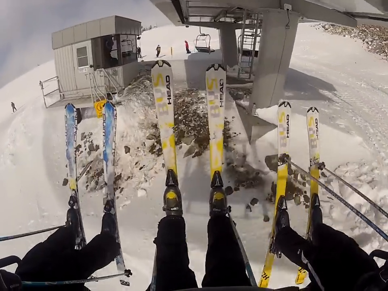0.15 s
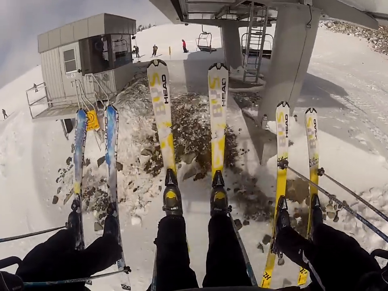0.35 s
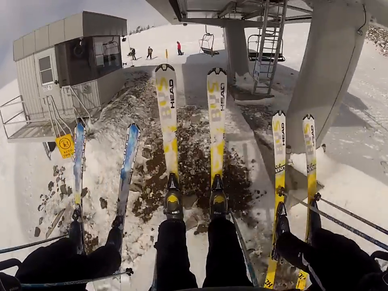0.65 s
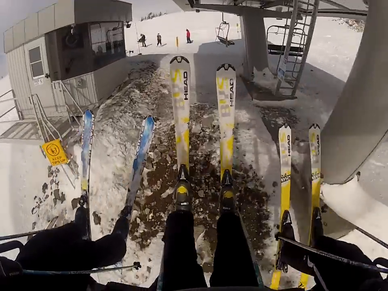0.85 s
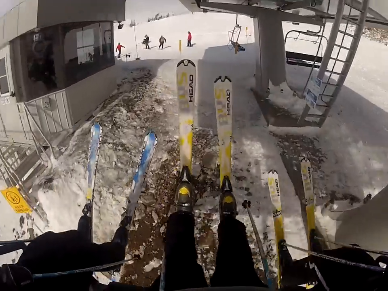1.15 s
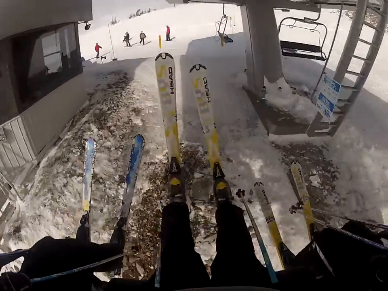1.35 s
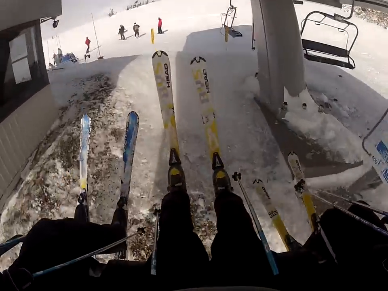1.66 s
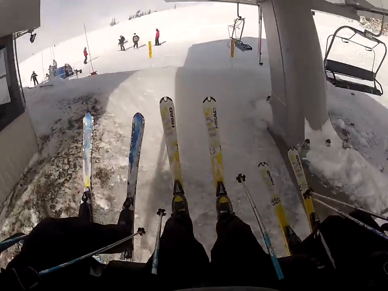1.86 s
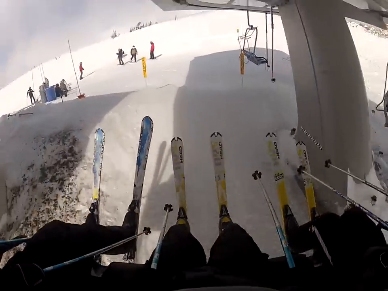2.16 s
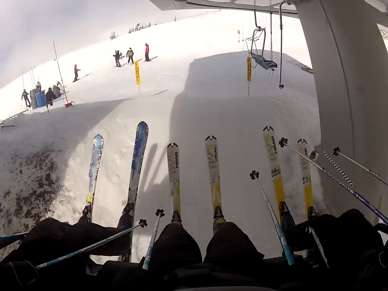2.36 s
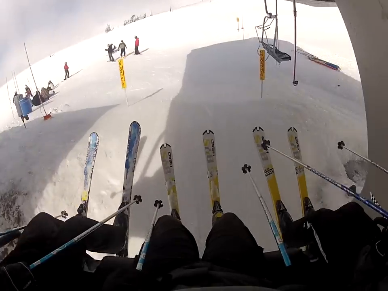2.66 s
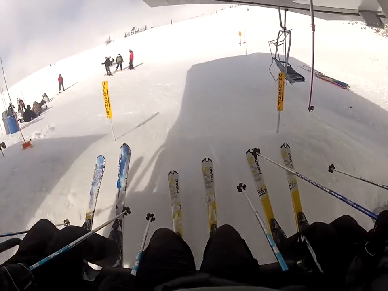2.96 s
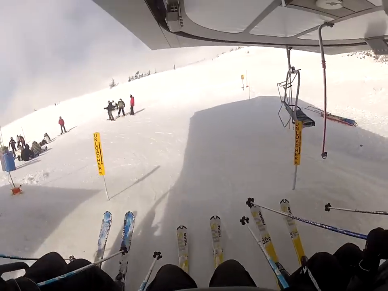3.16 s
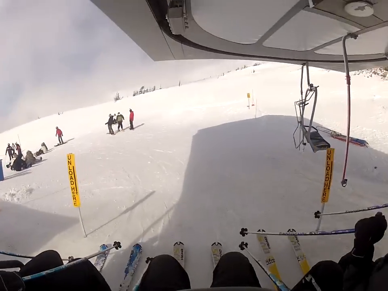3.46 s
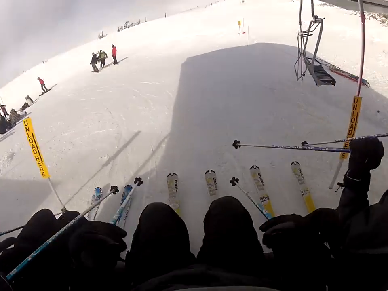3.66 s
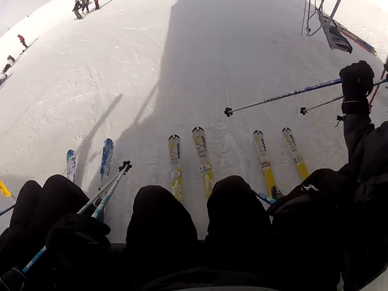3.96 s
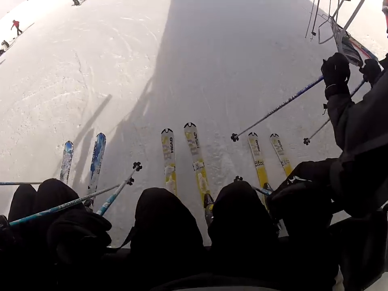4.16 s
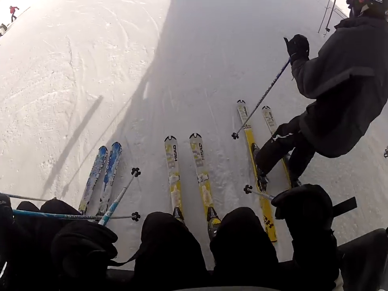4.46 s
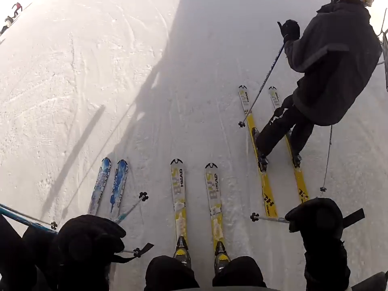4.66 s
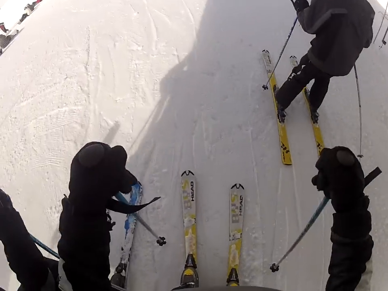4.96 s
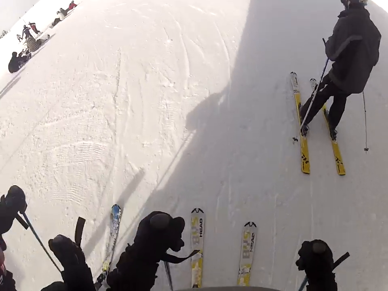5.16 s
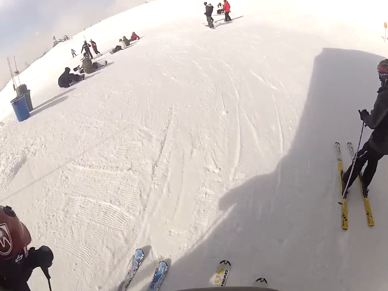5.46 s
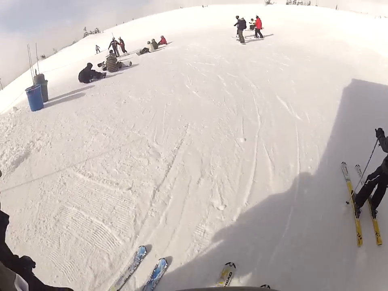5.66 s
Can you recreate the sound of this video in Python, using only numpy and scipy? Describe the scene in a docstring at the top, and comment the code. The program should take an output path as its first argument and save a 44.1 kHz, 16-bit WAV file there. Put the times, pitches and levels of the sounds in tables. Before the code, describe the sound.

Under a ski lift terminal, a low drive hum swells and dips over rumble and faint sheave whirr. Dull jolts and short scrapes cluster around one second. A metal safety bar clacks twice midway, then skis slap the snow with short thumps and glide with a soft bright hiss. Heard close and muffled from a small camera in a sealed case, with coarse, grainy treble.

```python
"""A drive hums and rumbles and sheaves whirr as a chair glides under the terminal of a ski lift.
Dull jolts and short scrapes come next, later clacks of the safety bar, slaps of skis and hiss on snow.
The hum is three wavering partials, the rest shaped noise, dying modes and short low swings.
A small camera in a sealed case hears it: it samples at 8 kHz and holds each sample,
so mirror images of everything fill the treble."""
import sys
import numpy as np
from scipy import signal
from scipy.fft import rfft, irfft
from scipy.io import wavfile
from scipy.ndimage import uniform_filter1d

SR = 44100
rng = np.random.default_rng(int(sys.argv[2]) if len(sys.argv) > 2 else 0)


def elevation(decibels):
    """Turn decibel levels (scalar or array-like) into linear amplitude ratios."""
    levels = np.asarray(decibels, float)
    return 10 ** (levels / 20)


def materialize(psi):
    """Save the field psi as 16-bit PCM at rate SR to the path in sys.argv[1].

    A 1-D psi becomes a single channel; in a 2-D psi each row is a channel.
    """
    bounded = np.clip(np.atleast_2d(psi).T, -1, 1)
    quanta = np.round(bounded * 32767).astype(np.int16)
    wavfile.write(sys.argv[1], SR, quanta)


N = 255780


def evened(x):
    """Scales to rms 1."""
    return x / np.sqrt(np.mean(x ** 2) + 1e-20)


def curve(rows, column=1):
    """One dB column of a table as a gain at every sample, -120 dB outside the table."""
    rows = np.array(rows)
    return elevation(np.interp(np.arange(N) / SR, rows[:, 0], rows[:, column], -120, -120))


def wander(top_hz):
    """Slow chance of rms 1: noise low-passed at top_hz."""
    rate_hz, settle = 1000, 400
    noise = rng.standard_normal(N // 44 + 500)
    slow = signal.lfilter(*signal.butter(2, top_hz, fs=rate_hz), noise)[settle:]
    return np.interp(np.arange(N) / SR, np.arange(len(slow)) / rate_hz, evened(slow))


def coloured(x, gain):
    """Filters by a magnitude given on the FFT bins, then scales to rms 1."""
    return evened(irfft(rfft(x) * gain, N))


def lumpy_noise(lumps_db, lumps_hz):
    """White noise whose level wanders by lumps_db rms."""
    return rng.standard_normal(N) * elevation(lumps_db * wander(lumps_hz))


def shaped(points, lumps_db, lumps_hz):
    """Lumpy noise with a spectrum drawn through points on a log frequency axis."""
    hz = np.fft.rfftfreq(N, 1 / SR)
    f, db = np.transpose(points)
    spectrum_db = np.interp(np.log(hz + 1), np.log(f + 1), db)
    return coloured(lumpy_noise(lumps_db, lumps_hz), elevation(spectrum_db))


def peaks_gain(peaks, hz):
    """Magnitude of resonances side by side, their powers added."""
    return np.sqrt(sum(elevation(2 * db) / (1 + (2 * (hz - f) / w) ** 2) ** 2.01 for f, w, db in peaks))


# Case resonances. Each row: centre in Hz, width in Hz, relative level in dB.
CASE_PEAKS = [(430, 356, 0), (702, 200, -3), (913, 257, 3), (1400, 1400, -3), (2090, 390, 0),
              (2940, 100, -12.5), (3620, 770, -13.5)]
# Case notches. Each row: centre in Hz, width in Hz, depth from 0 to 1.
CASE_NOTCHES = [(1070, 98, 0.52), (1730, 143, 0.59)]


def case_gain(hz, tilt_db):
    """Case resonances and notches, tilted by tilt_db per octave above 400 Hz."""
    dips = np.prod([1 - np.clip(depth, 0, 1) * np.exp(-((hz - f) / w) ** 2)
                    for f, w, depth in CASE_NOTCHES], axis=0)
    tilt = elevation(tilt_db * np.log2(np.maximum(hz, 400) / 1000))
    return dips * peaks_gain(CASE_PEAKS, hz) * tilt


def burst(noise, tilt_db):
    """A piece of noise heard through the case, rms 1."""
    return evened(irfft(rfft(noise) * case_gain(np.fft.rfftfreq(len(noise), 1 / SR), tilt_db)))


def crack(noise, tilt_db, t):
    """A burst that rises in about 1 ms and dies by 60 dB in 14 ms."""
    return burst(noise, tilt_db) * (1 - np.exp(-t / 0.00099)) * elevation(-60 * t / 0.014)


def ringing(modes, t):
    """Modes set off by a blow, each dying by 60 dB in its t60."""
    rise = 1 - np.exp(-t / 0.00045)
    return rise * sum(elevation(db - 60 * t / t60) * np.sin(2 * np.pi * hz * t) for hz, db, t60 in modes)


def add(mix, start_s, sound):
    """Mixes a sound in at start_s, in place."""
    part = mix[round(start_s * SR):][:len(sound)]
    part += sound[:len(part)]


# Hum as the chair moves under the roof. Each row: time in seconds, level in dB before the nodes.
HUM_LEVEL = [(0.0, -34), (0.39, -25.5), (0.77, -22.5), (1.05, -21.5), (1.3, -20.5), (1.6, -24), (2.1, -29),
             (2.5, -19.5), (2.74, -22.5), (3.0, -17), (3.41, -18), (3.56, -14), (3.8, -22), (3.95, -24.5),
             (4.36, -24), (4.7, -32), (5.05, -34), (5.15, -25), (5.35, -21.5), (5.45, -25.5), (5.8, -20.5)]
# Its overtones. Each row: time in seconds, second partial in dB, third partial in dB, before flutter.
OVERTONE_LEVELS = [(0.0, -49, -58.5), (0.4, -44, -47.5), (0.85, -44.5, -45.5), (1.11, -36.5, -47.5),
                   (1.6, -47.5, -36.5), (1.95, -41, -46.5), (2.6, -46, -45.5), (3.55, -35.5, -41),
                   (3.75, -33.5, -56), (4.0, -49.5, -45.5), (4.45, -38, -61), (4.95, -40, -47.5),
                   (5.35, -38, -60), (5.48, -43, -48.5), (5.8, -36.5, -59)]
# Quiet spots of the standing wave that the chair crosses.
# Each row: time in seconds, half width in seconds, depth in dB.
HUM_NODES = [(0.45, 0.054, -32), (0.66, 0.071, -20), (0.87, 0.14, -24), (1.44, 0.13, -30),
             (1.71, 0.13, -35), (2.28, 0.12, -25), (2.83, 0.12, -28), (4.16, 0.3, -50), (4.46, 0.044, -17),
             (4.59, 0.11, -9)]
HUM_HZ, UNDER_DRIVE_S = 101.66, 1.55


def hum():
    """Three partials of the drive, wavering in phase, the overtones also in level.
    At each node the lowest sinks and turns half a cycle: ahead on approach, back after."""
    t = np.arange(N) / SR
    nodes = []
    for s, half_width_s, depth_db in HUM_NODES:
        x = (t - s) / half_width_s
        nodes.append((x + 1j * np.sign(s - UNDER_DRIVE_S) * elevation(depth_db)) / np.sqrt(1 + x ** 2))
    levels = [curve(HUM_LEVEL) * np.prod(nodes, axis=0),
              curve(OVERTONE_LEVELS), curve(OVERTONE_LEVELS, column=2)]
    out = np.zeros(N)
    for k, level in enumerate(levels):
        waver_rad = (0.3 + 0.3 * k) * wander(2.5 + 0.7 * k)
        flutter_db = min(k, 1) * 2.96 * wander(8.0)  # none on the lowest
        phase_rad = 2 * np.pi * (k + 1) * HUM_HZ * t + waver_rad
        out += np.sqrt(2) * (level * elevation(flutter_db) * np.exp(1j * phase_rad)).imag
    return out


# Rumble through the chair frame. Each row: time in seconds, body in dB, deepest shudder in dB.
RUMBLE_LEVELS = [(0.0, -41.5, -38), (0.2, -33.5, -39), (0.43, -32.5, -33.5), (0.53, -32, -34.5),
                 (0.92, -38, -31), (1.1, -27, -29), (1.45, -32, -28), (1.8, -31, -33), (2.0, -31.5, -32),
                 (2.6, -31, -29.5), (2.9, -34.5, -36.5), (3.15, -34.5, -29), (3.7, -33.5, -32),
                 (4.1, -37.5, -33), (4.8, -38, -32), (5.2, -40, -37.5), (5.8, -37.5, -44)]
# Spectrum of the body. Each row: frequency in Hz, relative density in dB per Hz.
BODY_SPECTRUM = [(44, -64), (75, -21), (113, 2.5), (263, -12), (312, -13), (399, -23.5), (600, -37),
                 (780, -78), (1320, -120)]
# Spectrum of the shudder. Each row: frequency in Hz, relative density in dB per Hz.
SHUDDER_SPECTRUM = [(8, -37), (18, -2), (30, -1), (55, 0.4), (85, 2), (130, -43)]


def rumble():
    """Low lumpy noise in two bands, as rollers and grip jolt the frame."""
    body = curve(RUMBLE_LEVELS) * shaped(BODY_SPECTRUM, lumps_db=1.0, lumps_hz=28.0)
    shudder = curve(RUMBLE_LEVELS, column=2) * shaped(SHUDDER_SPECTRUM, lumps_db=1.75, lumps_hz=6.3)
    return body + shudder


# Whirr of sheaves and haul rope. Each row: time in seconds, level in dB.
WHIRR_LEVEL = [(0.0, -57.5), (0.3, -55), (0.75, -55.5), (0.8, -51), (0.9, -48), (1.44, -46.5),
               (2.15, -42.5), (2.57, -48), (3.09, -45), (3.33, -48.5), (4.39, -51.5), (5.8, -49.5)]
WHIRR_TILT_DB_PER_OCTAVE = 0.47


def whirr():
    """Rolling noise of the machinery, coloured by the case."""
    gain = case_gain(np.fft.rfftfreq(N, 1 / SR), WHIRR_TILT_DB_PER_OCTAVE)
    return curve(WHIRR_LEVEL) * coloured(lumpy_noise(0.67, 32.0), gain)


# Dull jolts of the chair frame; the last two are low bounces after the ski slap at 5.012 s.
# Each row: start in seconds, peak in dB, pitch in Hz.
JOLTS_AND_BOUNCES = [(0.159, -20.5, 186), (.176, -20.5, 198), (0.294, -20.5, 188), (0.31, -21, 170),
                     (0.498, -21, 126), (0.516, -22, 120), (0.571, -13.5, 133), (0.967, -13, 110),
                     (1.024, -12.5, 141), (1.099, -16, 148), (1.164, -10, 118), (1.237, -21, 136),
                     (5.039, -13.5, 90.5), (5.051, -17.5, 75)]


def jolts_and_bounces():
    """Each jolt or bounce: a cosine under a bell-shaped envelope about a cycle wide."""
    out, t = np.zeros(N), np.arange(4096) / SR
    for s, db, hz in JOLTS_AND_BOUNCES:
        cycles = hz * t - 1.2
        add(out, s, elevation(db) * np.exp(-(cycles / 0.45) ** 2) * np.cos(2 * np.pi * cycles))
    return out


# Short scrapes of skis, poles and cloth.
# Each row: start in seconds, level in dB before the envelope, decay in seconds, tilt in dB per octave.
SHORT_SCRAPES = [(0.274, -50, 0.04, 10), (0.756, -39.5, 0.22, -20), (0.757, -39.5, 0.049, 3),
                 (0.789, -41, 0.037, 12), (0.829, -36, 0.018, 5), (0.872, -46, 0.01, -16),
                 (0.973, -43, 0.022, -10), (1.004, -39.5, 0.0087, 2), (1.026, -37.5, 0.051, -2.5),
                 (1.084, -39.5, 0.04, 2.5), (2.967, -41.5, 0.017, -1), (4.628, -44.5, 0.0092, 7),
                 (4.676, -44, 0.017, 2.5), (4.71, -44, 0.041, 8), (4.814, -43.5, 0.012, 4),
                 (4.757, -46, 0.022, -0.5), (4.879, -45, 0.03, 1.5)]
BITE_S, FIRM_DB = 0.0014, -38  # rise time of a scrape at this level; lighter ones rise more slowly


def scrapes():
    """Each scrape bites, grinds unevenly and trails off: noise through the case."""
    out, t = np.zeros(N), np.arange(8192) / SR
    noises = rng.standard_normal((len(SHORT_SCRAPES), 8192))
    for (s, db, length_s, tilt_db), noise in zip(SHORT_SCRAPES, noises):
        grit = elevation(1.34 * evened(uniform_filter1d(noise[::-1], size=130)))
        bite = 1 - np.exp(-t / (BITE_S * elevation(FIRM_DB - db)))
        stroke = grit * bite * np.exp(-(t / length_s) ** 1.6)
        add(out, s, elevation(db) * stroke * burst(noise, tilt_db))
    return out


# Clacks of the metal safety bar. Each row: start in seconds, level in dB.
BAR_CLACKS = [(3.5646, -23), (3.5835, -14.5)]
# Modes of the bar. Each row: frequency in Hz, relative level in dB, t60 in seconds.
BAR_MODES = [(930, -4, 0.02), (1920, 2, 0.012), (1405, -4.5, 0.013), (1150, -3.5, 0.012),
             (2360, -42, 0.0046)]
BAR_CRACK_DB, BAR_TILT_DB_PER_OCTAVE = 5.5, -1  # crack beside the ring
BOUNCE_S, BOUNCE_DB = 0.0044, -5  # delay and level of the second landing


def clacks():
    """The bar cracks, rings for a few ms and bounces once."""
    out, t = np.zeros(N), np.arange(4096) / SR
    ring = ringing(BAR_MODES, t)
    for (s, db), noise in zip(BAR_CLACKS, rng.standard_normal((len(BAR_CLACKS), 4096))):
        landing = elevation(BAR_CRACK_DB) * crack(noise, BAR_TILT_DB_PER_OCTAVE, t) - ring
        add(out, s, elevation(db) * landing)
        add(out, s + BOUNCE_S, -elevation(db + BOUNCE_DB) * ring)
    return out


def thump(thump_hz, t):
    """A low swing that swells and dies while its pitch sags from an octave up to thump_hz."""
    cycles = thump_hz * t
    turns = cycles + 0.5 * (1 - np.exp(-cycles / 0.5))
    return cycles / 0.26 * np.exp(1 - cycles / 0.42) * np.sin(2 * np.pi * turns)


# Skis slap down. Each row: start in seconds, crack in dB before its envelope (the ring follows it),
# crack tilt in dB per octave, thump scale in dB, thump pitch it sags to in Hz.
SKI_SLAPS = [(3.726, -24, 5, -11, 53.8), (3.91, -34, 5, -37, 77.5), (3.953, -40, -6, -39, 79),
             (5.012, -14, 7, -10, 72), (5.344, -18, 6.5, -13, 70)]
# Modes of a ski. Each row: frequency in Hz, relative level in dB, t60 in seconds.
SKI_MODES = [(1277, 1.5, 0.018), (1810, -2, 0.022), (660, -6, 0.017), (967, -3, 0.02), (2350, -3, 0.017),
             (3650, -1.5, 0.0058)]
SKI_RING_DB = -3  # beside the crack


def knocks():
    """Each slap on the snow ramp: a crack, the ring of the ski and a thump."""
    out, t = np.zeros(N), np.arange(4096) / SR
    ring = elevation(SKI_RING_DB) * ringing(SKI_MODES, t)
    noises = rng.standard_normal((len(SKI_SLAPS), 4096))
    for (s, crack_db, tilt_db, thump_db, thump_hz), noise in zip(SKI_SLAPS, noises):
        slap = elevation(crack_db) * (crack(noise, tilt_db, t) + ring)
        add(out, s, slap + elevation(thump_db) * thump(thump_hz, t))
    return out


# Strokes of skis gliding on the snow. Each row: start in seconds, end in seconds, level in dB.
GLIDE_STROKES = [(5.03, 5.251, -49), (5.28, 5.352, -47.5), (5.358, 5.471, -47), (5.474, 5.794, -52.5)]
# Bands of the gliding hiss. Each row: centre in Hz, width in Hz, relative level in dB.
SNOW_BANDS = [(3560, 550, 1.5), (2100, 710, 1.5), (1280, 300, -3)]
GLIDE_RISE_S, GLIDE_FALL_S = 0.012, 0.0098


def glide():
    """Bright hiss of ski bases: band noise, faded in and out stroke by stroke."""
    t = np.arange(N) / SR
    strokes = np.zeros(N)
    for start_s, end_s, db in GLIDE_STROKES:
        rise = (1 + np.tanh((t - start_s) / GLIDE_RISE_S)) / 2
        fall = (1 - np.tanh((t - end_s) / GLIDE_FALL_S)) / 2
        strokes += elevation(db) * rise * fall
    gain = peaks_gain(SNOW_BANDS, np.fft.rfftfreq(N, 1 / SR))
    return strokes * coloured(lumpy_noise(0.43, 36.0), gain)


def scene():
    """All sources at the one microphone."""
    machinery = hum() + rumble() + whirr()
    blows = jolts_and_bounces() + clacks() + knocks()
    return (machinery + blows + scrapes() + glide())[None]


def roll_off(x):
    """The treble ends steeply here."""
    return signal.sosfilt(signal.butter(12, 16520, fs=SR, output="sos"), x)


def record(dry):
    """Low-pass, sample at 8 kHz, hold each sample six steps of 48 kHz, resample, limit the band."""
    held_hz, out_hz = 8000, 48000
    low_pass = signal.firwin(201, 3780.0, window=("kaiser", 3.0), fs=SR)
    smooth = signal.oaconvolve(dry[0], low_pass, "same")
    sampled = signal.resample(smooth, N * held_hz // SR)
    held = np.repeat(sampled, out_hz // held_hz)
    back = signal.resample_poly(held, 147, 160)[:N]  # 48 kHz to SR
    band_limit = signal.firwin(511, 15400.0, window=("kaiser", 8), fs=SR)
    limited = signal.oaconvolve(back, band_limit, "same")
    return roll_off(limited[None])


dry = scene()
out = record(dry)
materialize(out)
```